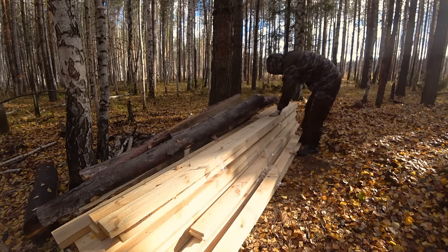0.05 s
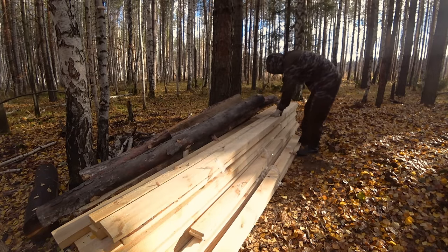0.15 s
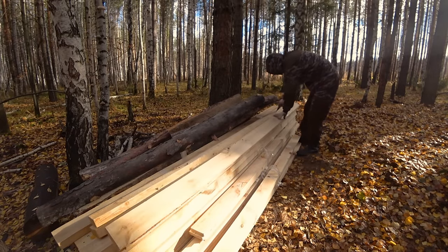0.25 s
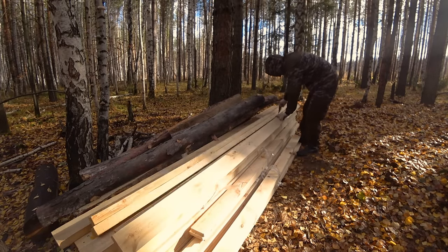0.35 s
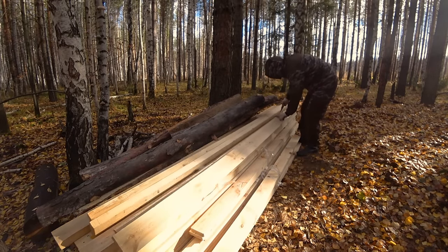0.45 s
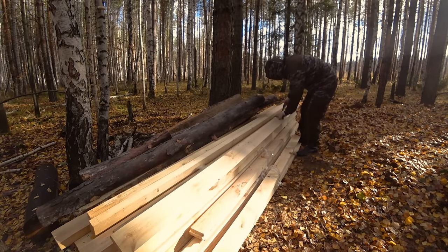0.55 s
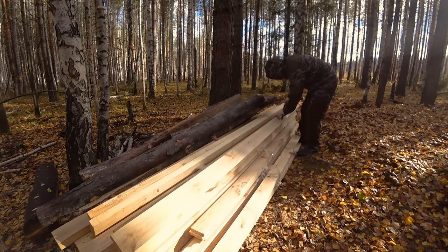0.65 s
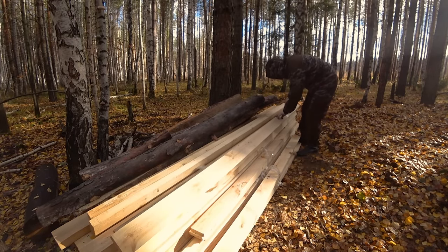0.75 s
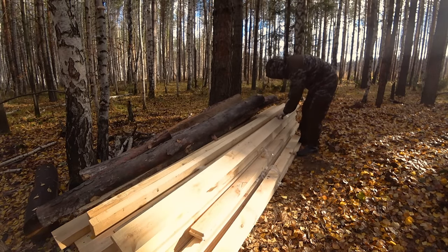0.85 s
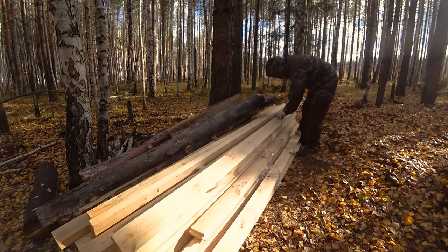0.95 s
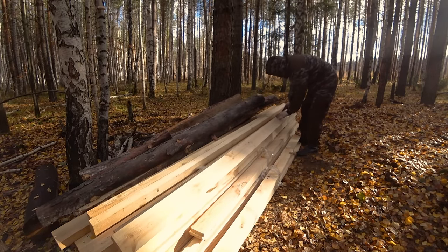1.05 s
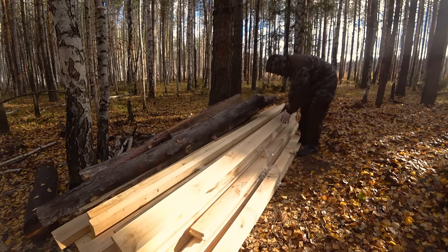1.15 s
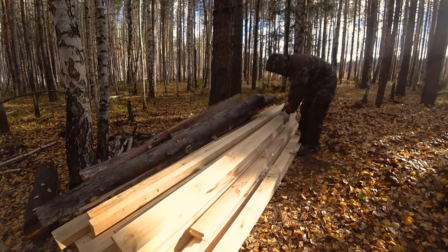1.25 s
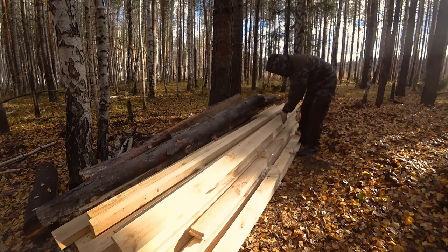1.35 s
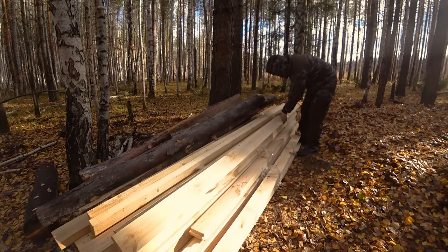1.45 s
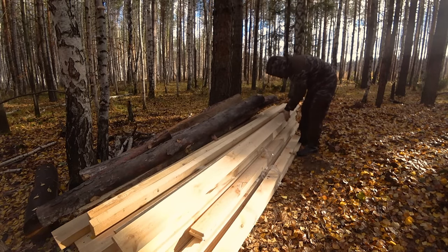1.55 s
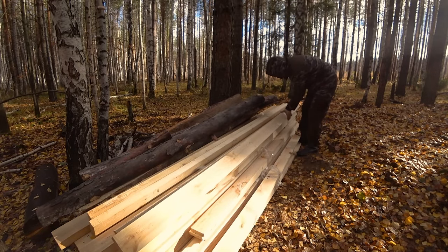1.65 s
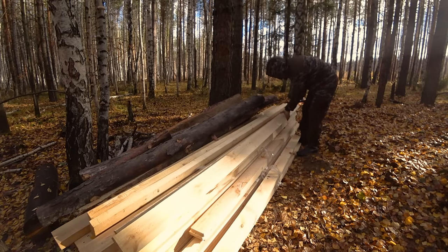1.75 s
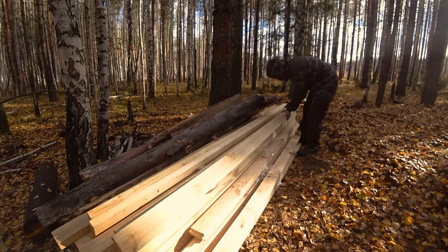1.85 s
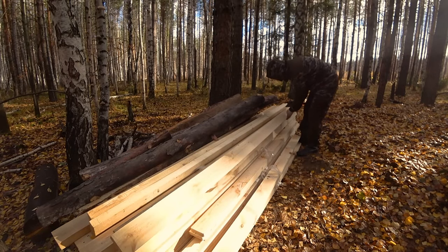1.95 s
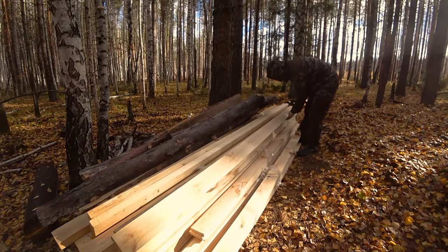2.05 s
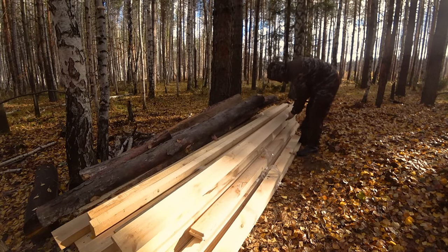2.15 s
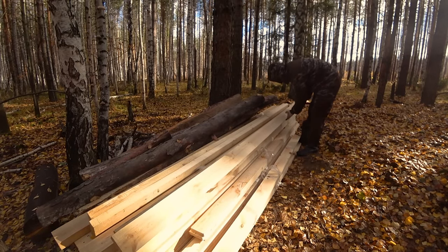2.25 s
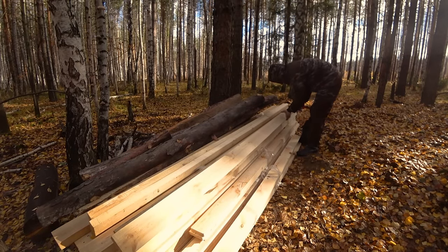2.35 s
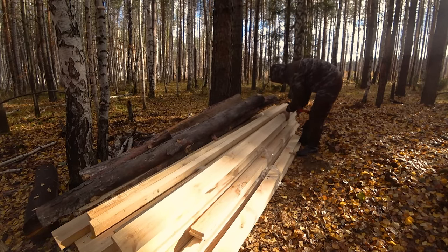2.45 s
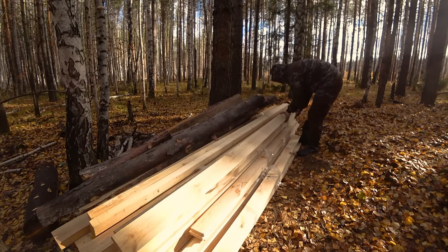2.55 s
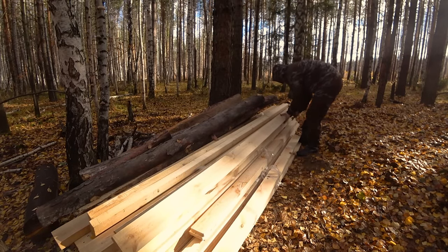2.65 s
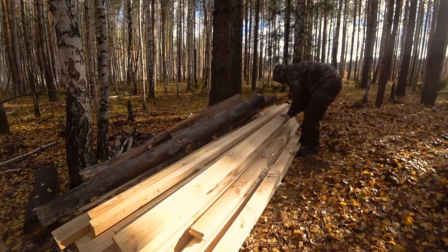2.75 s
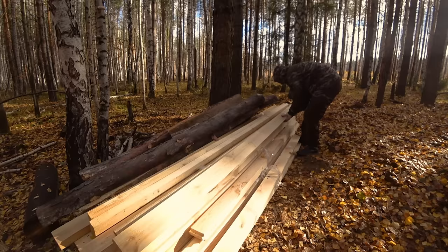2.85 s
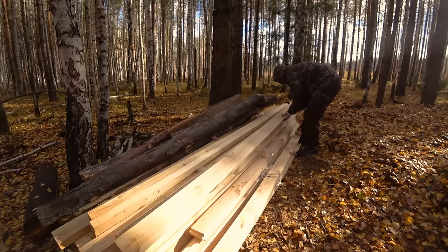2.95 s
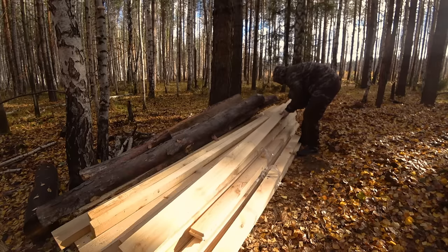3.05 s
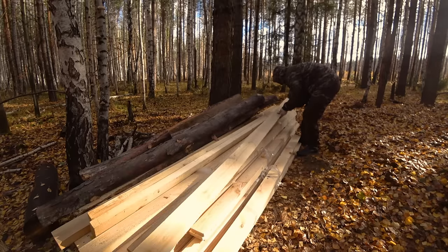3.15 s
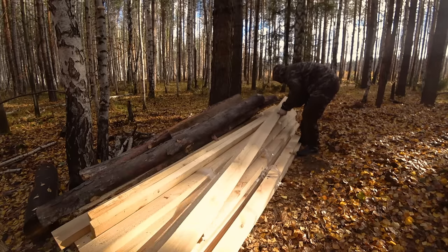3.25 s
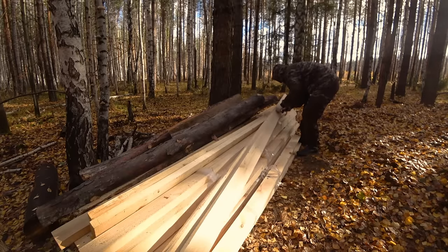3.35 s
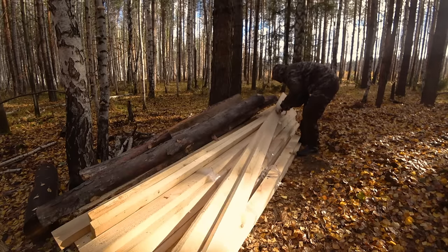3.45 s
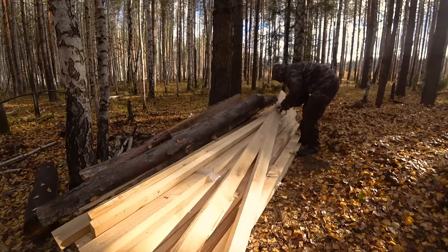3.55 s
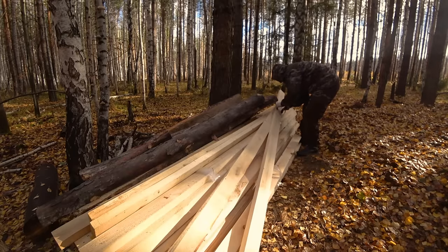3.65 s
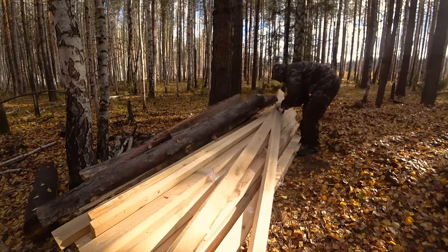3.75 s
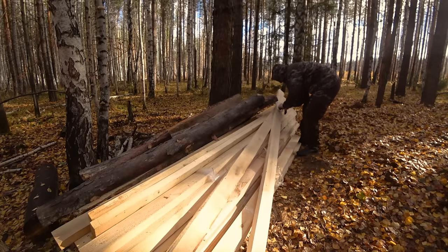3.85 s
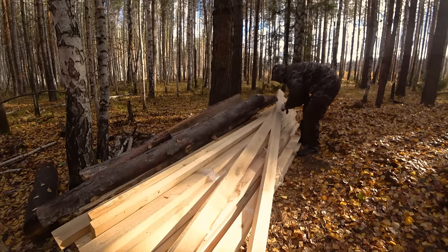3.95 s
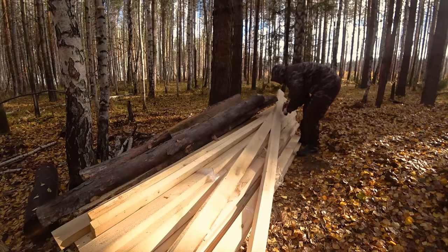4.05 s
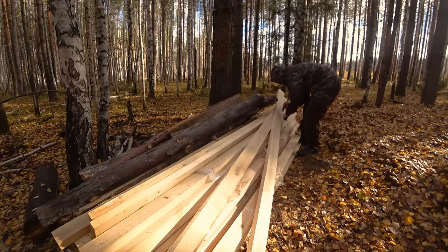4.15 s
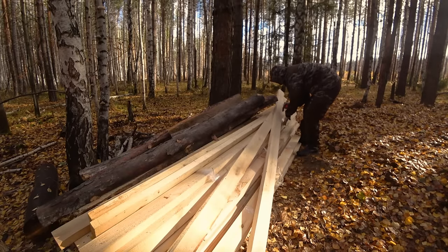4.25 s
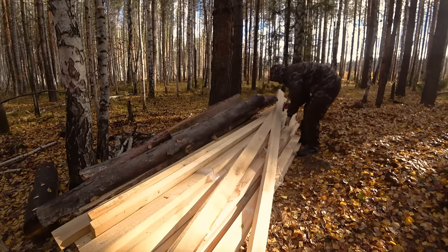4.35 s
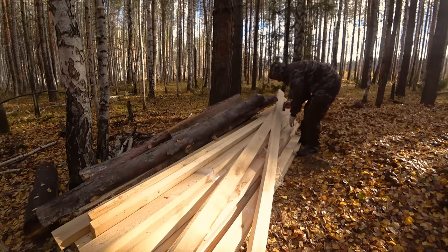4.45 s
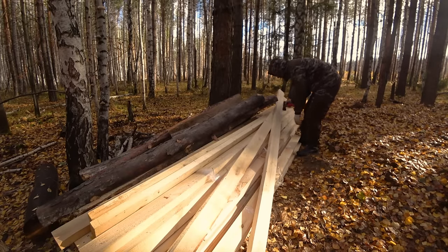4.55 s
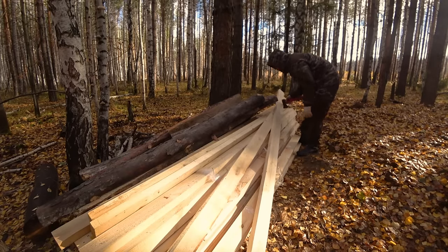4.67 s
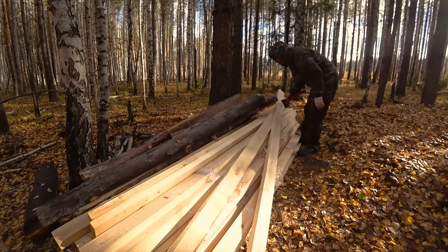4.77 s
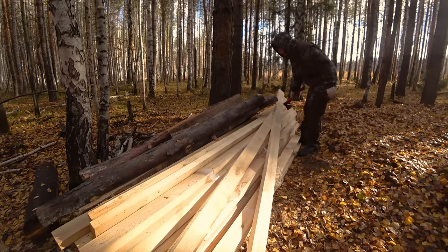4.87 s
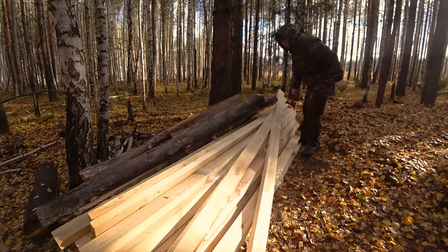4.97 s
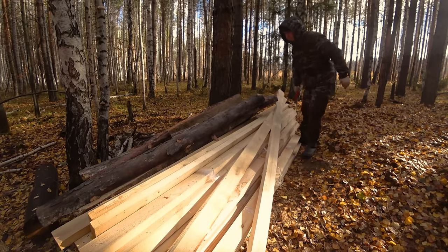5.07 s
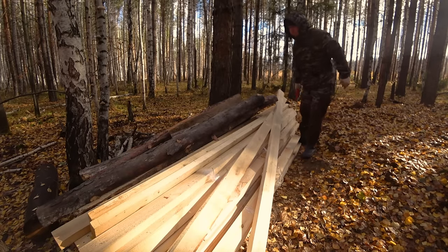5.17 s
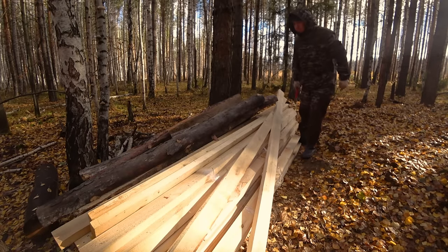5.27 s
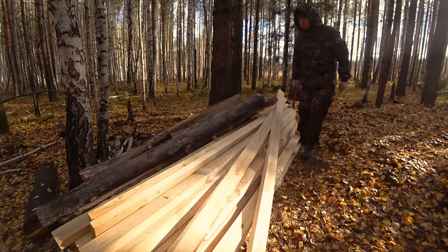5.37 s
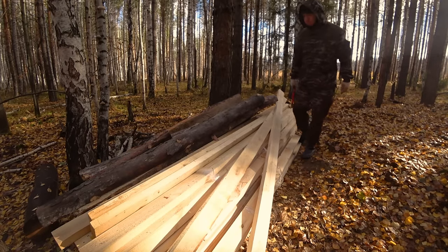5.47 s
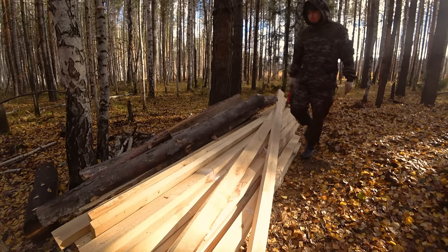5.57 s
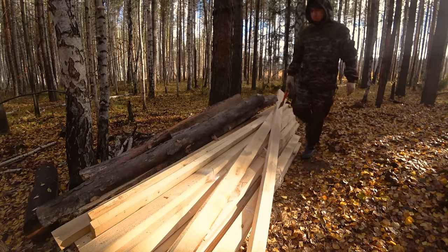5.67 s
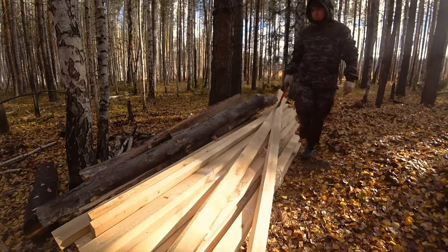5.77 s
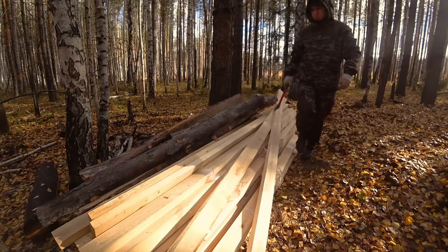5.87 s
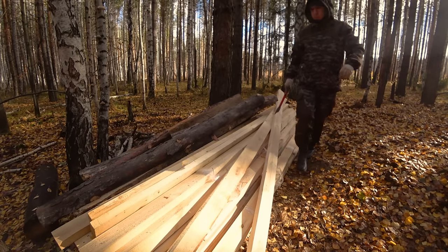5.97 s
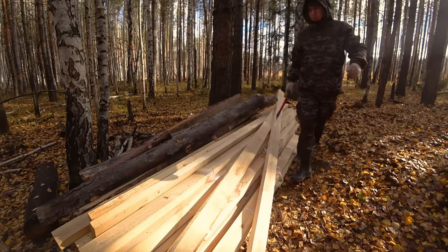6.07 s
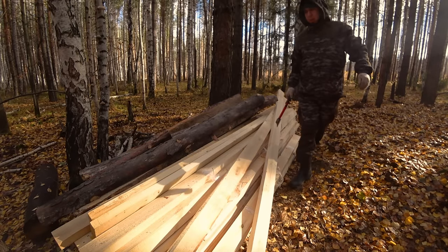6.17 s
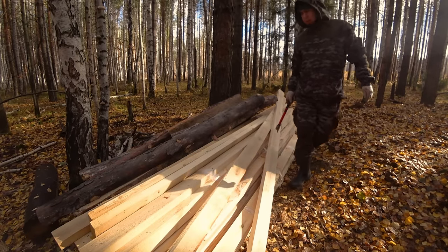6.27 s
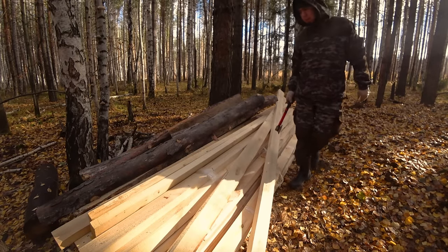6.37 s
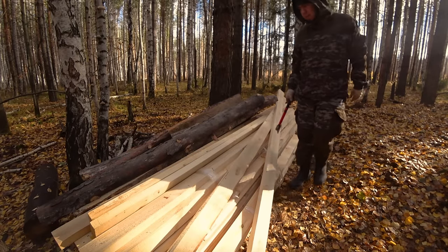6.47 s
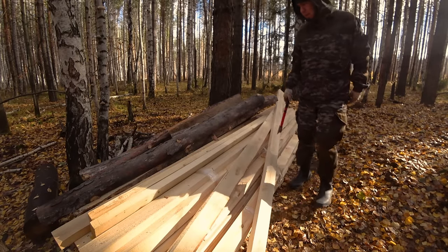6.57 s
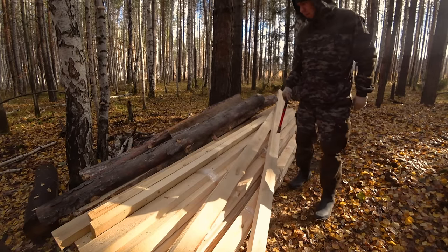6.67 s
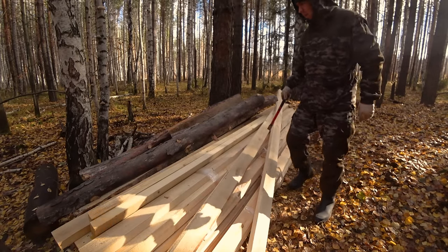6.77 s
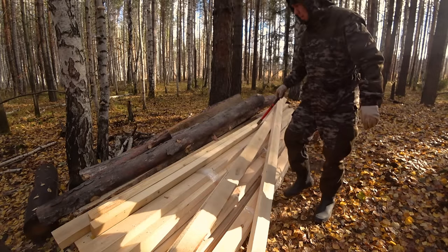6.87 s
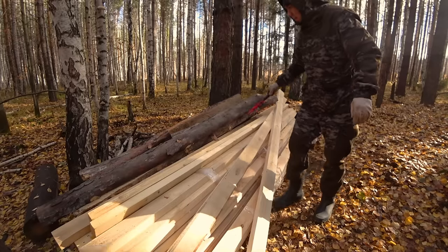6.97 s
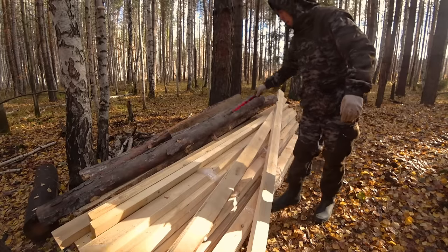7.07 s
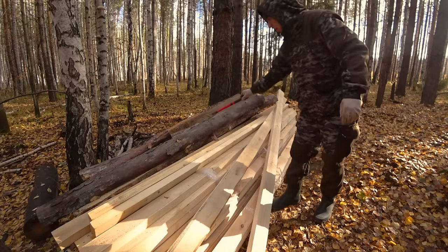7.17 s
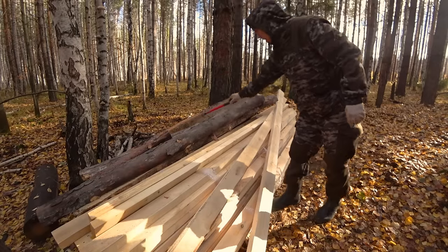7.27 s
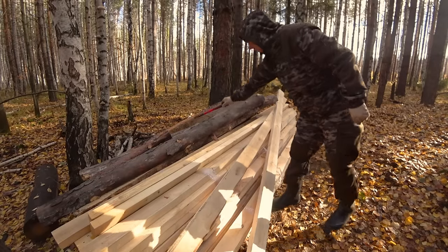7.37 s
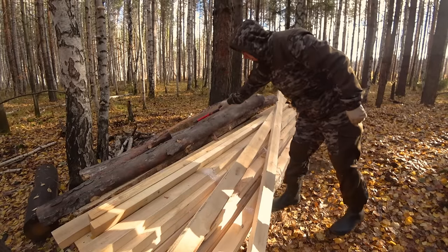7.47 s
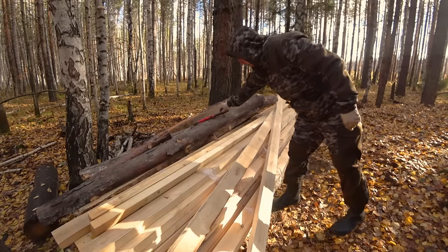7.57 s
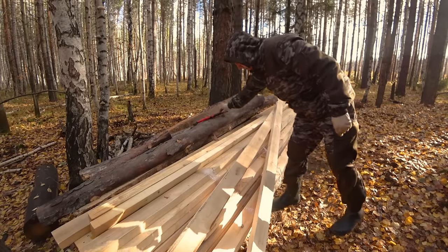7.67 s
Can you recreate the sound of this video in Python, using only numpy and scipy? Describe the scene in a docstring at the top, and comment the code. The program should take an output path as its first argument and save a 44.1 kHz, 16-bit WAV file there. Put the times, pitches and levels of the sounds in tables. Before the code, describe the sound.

Sawn planks are shifted on a pile outdoors: bright edge clacks, short woody rings, dry fibre crackle and rasping in two bursts separated by quiet air. The wood settles, boots brush softly then crunch nearer through dry leaves, and timber thumps dully to finish. Near, dry stereo pickup with soft hiss, a slight right lean and a thin tree-trunk echo.

```python
"""Sawn boards knock, bounce and clack on a pile in an autumn forest, rough faces scraping, splinters snapping;
later, boots wade through dry leaves. Boards are sums of decaying bending modes, clacks and snaps are short
filtered noise bursts, scrapes and leaves are streams of tiny random contacts, and weight on the soil is a
damped low tone with noise. Tree trunks return a faint noise-tail echo over slowly swaying forest air."""
import sys
import numpy as np
from scipy import signal
from scipy.fft import rfft, irfft, next_fast_len
from scipy.io import wavfile
from scipy.ndimage import uniform_filter1d

SR = 44100
rng = np.random.default_rng(int(sys.argv[2]) if len(sys.argv) > 2 else 0)


def to_wav(sig):
    """Store sig (one row per channel, or 1-D mono) as 16-bit WAV at the path in sys.argv[1].

    Samples outside -1..1 are clipped; the rate is SR.
    """
    pcm = np.clip(np.atleast_2d(sig), -1, 1) * 32767
    pcm = np.round(pcm).astype(np.int16)
    wavfile.write(sys.argv[1], SR, pcm.T)  # frames by channels


N = 340452  # samples
TIME = np.arange(N) / SR
RING_TIME = TIME[:SR // 3]
CONTROL_TIME = np.arange(0, N / SR, .002)  # a coarse clock for slow gain curves
GRID_HZ = np.linspace(1, SR / 2, 2049)  # where filter responses are drawn


def undb(db):
    """Decibels to gain."""
    return np.exp(np.asarray(db) * (np.log(10) / 20))


def unit(x):
    """Scale to rms 1."""
    return x / np.sqrt(np.mean(x ** 2))


def fade(t60, t=RING_TIME):
    """Decay that loses 60 dB in t60 seconds."""
    return np.exp(-np.log(1000) * t / max(t60, 1e-4))


def spectrum(points, hz=GRID_HZ):
    """Join (Hz, value) points on a log-frequency axis."""
    point_hz, value = np.transpose(points)
    return np.interp(np.log(hz + 1), np.log(point_hz + 1), value)


def resonance(hz, q):
    """Response of one resonance, in dB."""
    return -10 * np.log10(1 + (q * (GRID_HZ / hz - hz / GRID_HZ)) ** 2)


def tint(x, db):
    """Causal minimum-phase filter with the given dB response, made by folding the cepstrum."""
    cepstrum = irfft(np.log(undb(db)))
    half = len(cepstrum) // 2
    cepstrum[1:half] *= 2
    cepstrum[half + 1:] = 0
    impulse = irfft(np.exp(rfft(cepstrum)))
    return signal.oaconvolve(x, impulse)[:len(x)]


def add(track, s, x):
    """Mix a sound in at time s."""
    i = min(int(s * SR), N)
    track[i:i + len(x)] += x[:N - i]


def walk(rate):
    """Random level that glides to a new value `rate` times a second; spread near 1."""
    k = int(SR / rate)
    held = np.repeat(rng.standard_normal(N // k + 1), k)
    return unit(uniform_filter1d(held, k)[:N])


def grains(rate, spread_db, patchy_db, patch_rate):
    """Tiny contacts of uneven size, `rate` a second on average, that come in louder and softer bunches."""
    size = np.minimum(rng.exponential(size=N // 4), 4)
    sign = rng.choice([-1, 1], N // 4)
    at = np.flatnonzero(rng.random(N) < rate / SR)[:len(size)]
    bunch = np.interp(at * patch_rate / SR, np.arange(N // 100), rng.standard_normal(N // 100))
    # sqrt(3/2) gives back the spread that interpolation takes away
    level_db = spread_db * size[at // 4] + patchy_db * np.sqrt(3 / 2) * bunch
    out = np.zeros(N)
    out[at] = sign[at // 4] * undb(level_db)
    return out


def swell(s, rise, hold, fall):
    """Attack, hold from time s, release; rise and fall are the seconds that 20 dB take."""
    early = np.maximum(s - CONTROL_TIME, 0)
    late = np.maximum(CONTROL_TIME - s - hold, 0)
    return .1 ** np.minimum(early / max(rise, 1e-3) + late / max(fall, 1e-3), 6)


def per_sample(curves):
    """Slow gain curves at the sample rate."""
    return [np.interp(TIME, CONTROL_TIME, curve) for curve in curves]


# bending modes of three pieces of timber, by name: pitch_hz, level_db, t60_s (before the ring length factor)
BOARD_MODES = { "upper": [(149, -15.5, 0.29), (224, -10, 0.037), (276, 2, 0.15), (366, -7.5, 0.057),
               (433, -2.5, 0.12), (543, 2.5, 0.088), (628, 1.5, 0.062), (760, -13, 0.033),
               (800, -4.5, 0.09), (950, -1.5, 0.041), (1053, -3.5, 0.13), (1140, -14, 0.087),
               (1373, -10.5, .07)], "long": [(144.3, -19, 0.21), (282.4, -1, 0.27), (384.6, -11, 0.14),
               (474, -4, .18), (580.3, -11, 0.16), (608.5, -2.5, 0.23), (710, 3.5, 0.09), (803, -2, 0.071),
               (848, -2.5, 0.087), (820, -11, 0.042), (985, -3.5, .08), (1128, -12.5, 0.05),
               (1428, -12, 0.071), (1510, -7.5, 0.097), (1774, -9, 0.052), (1947, -19, .06),
               (2150, -21.5, 0.044)], "lower": [(155, -6.5, 0.29), (253, 5.5, 0.076), (292, 1.5, 0.17),
               (350, -9.5, 0.33), (482, 6.5, 0.3), (552, 2.5, 0.19), (683, 8, 0.2), (893, 3, 0.094),
               (996, -1, 0.046), (1167, 13.5, 0.02), (1500, -24, 0.045)]}


def timber_ring(name, length, travel_s=.003):
    """A board's modes; bending waves run slower the lower they are, so the bass arrives late."""
    out = 0
    for hz, db, t60 in BOARD_MODES[name]:
        t = np.maximum(RING_TIME - travel_s * np.sqrt(300 / hz), 0)
        out = out + undb(db) * np.sin(2 * np.pi * hz * t) * fade(t60 * length, t)
    return out


# a board lands on one end, then slaps flat: start_s, timber, level_db, lowest_excited_hz, highest_excited_hz,
# ring length factor, pile_clatter_db (against the ring), slap_delay_s, slap_db (over the first touch),
# factor on both excited limits for the slap
LANDINGS = [(.148, "upper", -20, 860, 3800, 0.83, 4, .015, 0, 0.4),
            (.26, "upper", -34, 130, 2000, 0.4, 7.5, .006, -15, 0.82),
            (0.3444, "upper", -32, 750, 1044, .23, -3.5, 0.0046, -17, 0.79),
            (.355, "upper", -30.5, 115, 2000, 1.7, 2.5, .019, -9, 0.66),
            (.483, "upper", -18.5, 299.8, 660, 2, -8, 0.0079, -2.5, 0.91),
            (.558, "upper", -29, 329.8, 558.4, .7, -10, .006, 3, 1.06),
            (1.538, "long", -39.5, 453, 950, 0.9, -3.5, .011, 2, 0.9),
            (2.824, "long", -19, 282, 1005, 1, -7.5, .009, 6, 1.41),
            (3.167, "long", -31, 130, 2400, 0.89, 1.5, .012, -3.5, 0.37),
            (3.655, "long", -20, 390, 2500, 1.9, -1, .007, -4, 0.74),
            (3.791, "long", -38.5, 90, 900, 0.61, 7.5, .008, -6, 1.1),
            (3.884, "long", -42, 400, 800, 0.42, -1, 0.033, -1.5, 0.54),
            (7.086, "lower", -31.5, 119, 700, 1.22, 16, .006, -7.5, 3.5),
            (7.584, "lower", -14, 175, 440, 1.05, -6.5, .004, 1.5, 2.06),
            (7.707, "lower", -29.5, 120, 446, 2.1, 10, .004, -19, 1)]
# rebound against the slap: its wait in slap delays, its level in dB, the factor on its band
REBOUND_WAIT, REBOUND_DB, REBOUND_SOFTNESS = 1.7, -8.5, .75


def contacts():
    """Every landing is a first touch, a slap, and a weaker, softer rebound on the same ringing board."""
    for s, name, db, low_hz, high_hz, length, clatter_db, delay, slap_db, hardness in LANDINGS:
        modes = timber_ring(name, length)
        touch = 0, 0, 1
        slap = delay, slap_db, hardness
        rebound = delay * (1 + REBOUND_WAIT), slap_db + REBOUND_DB, hardness * REBOUND_SOFTNESS
        for late, lift_db, band in [touch, slap, rebound]:
            yield s + late, name, modes, db + lift_db, low_hz * band, high_hz * band, length, clatter_db


# colour of the jostled pile: pitch_hz, level_db
PILE_COLOUR = [(50, -36), (105, -16), (160, 1.5), (300, -0.5), (700, -2.5), (1100, -2), (1350, -5),
               (1900, -6.5), (3500, -16), (4500, -10.5), (7000, -17), (16000, -37)]


def knocks(radiate_hz=125, choke_t60=0.06, clatter_t60=0.11):
    """Each blow rings one board and jostles the pile; a softer contact leaves the high modes still."""
    out, attack, blows = np.zeros(N), slice(SR // 80), list(contacts())
    # narrow boards radiate little bass
    radiation = -10 * np.log10(1 + (radiate_hz / (GRID_HZ + 10)) ** 8)
    for s, name, modes, db, low_hz, high_hz, length, clatter_db in blows:
        contact = -10 * np.log10((1 + (low_hz / GRID_HZ) ** 5) * (1 + (GRID_HZ / high_hz) ** 5))
        contact = np.maximum(contact, -50) + radiation
        # the next contact on the same board chokes what still rings
        free_s = min([row[0] - s for row in blows if row[1] == name and row[0] > s], default=1)
        choke = fade(choke_t60, np.maximum(RING_TIME - free_s, 0))
        ring = tint(modes * choke, contact)
        noise = rng.standard_normal(len(RING_TIME)) * fade(clatter_t60 * length)
        clatter = tint(noise, contact + spectrum(PILE_COLOUR))
        # levels are set over the attack, not the whole ring
        blow = ring / ring[attack].std() + undb(clatter_db) * clatter / clatter[attack].std()
        add(out, s, undb(db) * blow / blow[attack].std())
    return out


# short cross-grain modes that edges and rasping ring: pitch_hz, width_hz (before sharpening), lift_db
GRAIN_PEAKS = [(1713, 13, 0.5), (1878, 40, 1), (1970, 35, 6), (2120, 35, 2.5), (2240, 70, 1),
               (2486, 8.9, 3.5), (2868, 26, 3.5), (3820, 35, 8.5), (4270, 18, 4), (4443, 27, 5.5)]


def cross_grain():
    """Narrow peaks that the wood lends to every hard contact, in dB."""
    return sum(db * undb(2 * resonance(hz, hz / width)) for hz, width, db in GRAIN_PEAKS)


def burst(t60, tail_db, tail_t60, colour):
    """A sudden crack with a weak tail from the wood around it; peak 1."""
    t = RING_TIME[:SR // 6]
    envelope = fade(t60, t) + undb(tail_db) * fade(tail_t60, t)
    x = tint(rng.standard_normal(len(t)) * envelope, colour)
    return x / np.abs(x).max()


# hard edge-on-edge clacks: start_s, peak_db, pitch_hz, t60_s
EDGE_CLACKS = [(.1465, -15, 2700, .03), (.151, -1.5, 2900, .014), (.158, -18, 2700, .24),
               (.2025, -11, 1837, .009), (.2335, -19, 2802, .02), (.2825, -20, 2330, .025),
               (.673, -26, 1840, 0.021), (2.103, -42.5, 1700, .02), (3.1685, -12, 2718, .025),
               (3.29, -10, 1813, .014), (3.3025, -15, 1800, 0.13), (3.365, -27.5, 1703, .012),
               (3.3945, -14, 2900, .02), (3.4185, -27.5, 2200, .01), (3.653, -8.5, 1850, .05),
               (3.672, -16.5, 2088, .06), (3.942, -25, 1720, .018), (4.704, -41.5, 2090, .012),
               (6.212, -31, 2860, .016), (7.0908, -26, 2305, .036), (7.585, -21, 2570, 0.013),
               (7.597, -45, 4800, .13)]


def clacks():
    """Hard edges meet and ring briefly across the grain."""
    out = np.zeros(N)
    edge = [(100, -17.5), (1200, -4), (2000, -1), (3600, -4), (4600, 2.5),
            (7000, -6.0), (9000, -5.0), (12000, -9.5), (16000, -35.5)]  # (Hz, dB)
    for s, db, hz, t60 in EDGE_CLACKS:
        colour = spectrum(edge) + resonance(hz, 3.1) + cross_grain()
        add(out, s, undb(db) * burst(t60, -22.0, 0.089, colour))
    return out


# splinters and twigs crack, then part: start_s, peak_db (first crack), pitch_hz, parting_wait_s
SPLINTER_SNAPS = [(.205, -21, 5000, .019), (.289, -18, 4200, 0.0073), (.415, -20, 5600, 0.0081),
                  (.547, -13.5, 6500, .01), (.569, -17, 6000, .001), (.619, -31.5, 5000, .015),
                  (.757, -27.5, 7500, 0.0072), (1.95, -24.5, 4100, .003), (1.96, -21, 4500, 0.0068),
                  (1.999, -36, 3990, 0.045), (3.024, -17, 4200, 0.011), (3.114, -20.5, 3500, 0.0083),
                  (3.153, -13, 4000, .004), (3.576, -9, 4700, .019), (3.618, -4.5, 4200, .005),
                  (3.703, -13, 4300, .001), (3.782, -17, 4540, .012), (3.906, -10.5, 5460, .001),
                  (4.136, -42, 4900, 0.05), (4.253, -39, 4900, 0.075), (4.61, -49.5, 4400, .001),
                  (4.705, -45.5, 4490, 0.00098), (5.01, -48.5, 4500, .001), (5.964, -35.5, 5000, .001),
                  (6.212, -31, 4160, 0.0027)]
# colour of tearing wood fibres, also heard in the slides: pitch_hz, level_db (per Hz)
FIBRE_COLOUR = [(300, -37.5), (1500, -19), (2700, -3), (3600, -8), (4200, 3.5), (5300, -2.5), (6900, -10.5),
                (8200, -5.5), (10500, -12.5), (13000, -18.5), (16000, -37)]


def snaps(parting_db=-2.5):
    """Splinters and twigs break in two cracks of a few milliseconds each, the second slightly weaker."""
    out = np.zeros(N)
    for s, db, hz, wait in SPLINTER_SNAPS:
        colour = .8 * spectrum(FIBRE_COLOUR) + resonance(hz, 1.1) + .5 * cross_grain()
        for late, lift_db in [(0, 0), (wait, parting_db)]:
            add(out, s + late, undb(db + lift_db) * burst(.004, -22, .022, colour))
    return out


# shoves of board over board: hardest_grip_s, build_up_s, run_out_s (both per 20 dB),
# fibre_crackle_db, edge_rasp_db, board_groan_db
BOARD_SHOVES = [(.165, 0.022, .12, -40, -43, -46), (.24, 0.073, 0.088, -42.5, -39, -61.5),
                (.292, 0.075, 0.055, -43, -40, -53), (0.358, 0.031, 0.18, -35, -40.5, -52),
                (0.498, 0.043, .06, -37.5, -38, -49.5), (.64, .1, .13, -53, -57.5, -62),
                (.82, 0.056, 0.07, -57.5, -67, -85), (1.95, 0.069, 0.05, -51.5, -47.5, -73.5),
                (2.012, 0.041, 0.054, -40.5, -65, -69.5), (2.928, 0.1, .15, -56.5, -45.5, -42),
                (3.025, .04, 0.065, -42, -53, -50), (3.115, .11, 0.06, -36, -47.5, -42),
                (3.152, .025, 0.036, -35.5, -46, -47), (3.179, .045, 0.08, -32, -45, -41.5),
                (3.24, 0.067, 0.14, -53, -39.5, -44), (3.305, 0.045, .13, -37, -41, -53.5),
                (3.39, .04, .06, -39, -46, -46), (3.484, 0.049, .05, -43, -47, -44.5),
                (3.605, 0.1, .15, -33, -43.5, -29.5), (3.671, 0.067, .06, -25, -27.5, -25.5),
                (3.755, .03, 0.06, -33.5, -42, -48.5), (3.795, 0.033, 0.087, -37.5, -40.5, -42.5),
                (3.92, .14, 0.066, -41, -54, -51), (3.972, .025, 0.037, -44, -56.5, -75)]


def friction():
    """Crackle, rasp and groan build up and run out together in every shove; three gain curves."""
    power = 0
    for s, rise, fall, *levels_db in BOARD_SHOVES:
        power = power + np.outer(undb(levels_db), swell(s, rise, 0, fall)) ** 2
    return per_sample(np.sqrt(power))


# colour of rasping edges: pitch_hz, level_db (per Hz)
RASP_COLOUR = [(300, -22), (900, -12), (1350, -5), (1850, -4.5), (2300, -4.5), (2900, -6), (3600, -12.5),
               (6000, -28.5), (16000, -60)]
# resonances of the dragged board: pitch_hz, width_hz (before sharpening), level_db (before it wanders)
GROAN_MODES = [(440, 170, -13), (600, 210, 0), (720, 83, 1.5), (800, 60, -3.5), (854, 17, -4),
               (1090, 47, -12)]


def slides(splinter_db=-7, shift_db=2.0):
    """Sawn faces catch and slip: fibres crackle, edges rasp and the dragged board groans."""
    crackle, rasp, groan = friction()
    torn = spectrum(FIBRE_COLOUR) + cross_grain()
    fibres = unit(tint(grains(3000, 3.5, 2.2, 130), torn))
    # now and then a thicker splinter catches and ticks out of the crackle
    splinters = unit(tint(grains(170, 3, 1.5, 40), torn))
    tearing = unit(fibres + undb(splinter_db) * splinters)
    slips = grains(1600, 2.2, 2.6, 80)
    edges = unit(tint(slips, spectrum(RASP_COLOUR) + cross_grain()))
    # the contact point travels, so the board's resonances take turns
    judder = grains(2400, 1.5, 1.3, 60)
    body = 0
    for hz, width, db in GROAN_MODES:
        body = body + undb(db + shift_db * walk(22)) * tint(judder, 1.4 * resonance(hz, hz / width))
    board = unit(body + undb(-25) * tint(slips, spectrum(PILE_COLOUR)))
    return crackle * tearing + rasp * edges + groan * board


# boots in dry leaves: start_s, swing_length_s, rustle_db, crunch_db,
# treble_db (driest leaves against the rustle)
BOOT_STEPS = [(0, .08, -65.5, -64, -9.5), (4.06, .06, -65, -84, 0.5), (4.29, 0.024, -54.5, -81, 0),
              (4.9, .1, -70.5, -93.5, 4), (5.39, .05, -72, -78, 4.5), (5.5, 0.055, -59.5, -79, 1),
              (5.76, 0.087, -68, -82, -0.5), (6.135, 0.028, -43.5, -55.5, -7),
              (6.36, 0.057, -82.5, -63.5, -5.5), (6.67, 0.042, -46, -42.5, 3.5),
              (7.08, .04, -51.5, -58.5, -2), (7.38, .14, -51, -59, 0.5)]
SWING_RISE_S, SWING_FALL_S = 0.029, 0.036  # time for 20 dB
# the sole lands this long after the swing; rise and fall times for 20 dB
LANDING_S, TREAD_RISE_S, TREAD_FALL_S = .05, .05, 0.12
# leaves spring up around the sole: level against the swing, time to settle by 20 dB
TREAD_RUSTLE_DB, SETTLE_S = -8, .17
# the heel stirs the leaves before the swing: level against the swing, time to rise by 20 dB
LIFT_DB, LIFT_S = -17, .15
SWING_CRUNCH_DB = -18  # a moving boot always crushes a few leaves: level against the rustle


def gait():
    """A heel lifts, the boot swings, then its sole lands; gains of rustle, its treble and crunch."""
    out = 0
    for s, length, rustle_db, crunch_db, treble_db in BOOT_STEPS:
        lands = s + length + LANDING_S
        lift = undb(LIFT_DB) * swell(s, LIFT_S, length, SWING_FALL_S)
        swing = swell(s, SWING_RISE_S, length, SWING_FALL_S)
        settle = undb(TREAD_RUSTLE_DB) * swell(lands, TREAD_RISE_S, 0, SETTLE_S)
        rustle = undb(rustle_db) * np.sqrt(lift ** 2 + swing ** 2 + settle ** 2)
        tread = undb(crunch_db) * swell(lands, TREAD_RISE_S, 0, TREAD_FALL_S)
        crunch = tread + undb(SWING_CRUNCH_DB) * rustle
        out = out + np.array([rustle, undb(treble_db) * rustle, crunch])
    return per_sample(out)


# colour of dry leaves: pitch_hz, level_db (per Hz)
LEAF_COLOUR = [(500, -47.5), (2000, -26), (3500, -9), (4300, 7), (5200, 1), (6700, -9.5), (8500, -5),
               (11000, -12), (13000, -22), (16000, -43)]


def steps(treble_hz=6500):
    """Dry leaves brush over the boots and crush under the soles."""
    rustle, treble, crunch = gait()
    leaves = unit(tint(grains(3000, 3.1, 2, 110), spectrum(LEAF_COLOUR)))
    high_pass = signal.butter(2, treble_hz, "high", fs=SR, output="sos")
    driest = signal.sosfiltfilt(high_pass, leaves)
    crushed = [(300, -20), (1000, -13.5), (1400, 2.5), (2300, 4), (3000, 3), (4500, 1.5), (16000, -41)]  # (Hz, dB)
    litter = unit(tint(grains(1400, 3.0, 1.6, 83), spectrum(crushed)))
    return rustle * (leaves - driest) + treble * driest + crunch * litter


# weight landing on the soil: start_s, level_db, pitch_hz, t60_s
SOIL_THUDS = [(0.351, -46.5, 84.1, 0.35), (.49, -48, 81, 0.37), (3.789, -33.5, 75.7, .28),
              (6.225, -49, 71, 0.18), (7.09, -47, 100.8, 0.17)]


def thuds():
    """The soft ground answers weight with a low, damped swing."""
    out = np.zeros(N)
    for s, db, hz, t60 in SOIL_THUDS:
        soil = unit(tint(rng.standard_normal(len(RING_TIME)), 2 * resonance(hz, 3.1)))
        envelope = fade(t60) * (1 - fade(.04))
        tone = np.sin(2 * np.pi * hz * RING_TIME)
        add(out, s, undb(db) * envelope * (tone + 0.46 * soil))
    return out


# phase between the two microphone ports: pitch_hz, left_lead_rad (negative: the right port leads)
PORT_LEAD = [(20, 0), (90, -.15), (200, -.4), (500, -.75), (1150, -.75), (2300, -.48), (3800, -.3),
             (7000, -.4), (16000, -.45)]


def from_right(x):
    """The work goes on right of centre, so the right microphone port leads."""
    size = next_fast_len(N + SR // 10, True) // 2 * 2
    lead = spectrum(PORT_LEAD, np.linspace(0, SR / 2, size // 2 + 1))
    turn = np.exp(1j * lead / 2)  # half the lead to each port
    whole = rfft(x, size)
    return np.array([irfft(whole * way)[:N] for way in (turn, turn.conj())])


def ground(x, db=-17):
    """Leaves and board ends close by scatter the treble a little differently to each port."""
    t = TIME[:SR // 60]
    scatter = rng.standard_normal((2, len(t))) * fade(.01, t)
    bright = tint(x, spectrum([(200, -14), (1500, -4), (4500, -1), (8000, 5), (12000, 7)]))  # (Hz, dB)
    return undb(db) * np.array([signal.oaconvolve(bright, s / np.linalg.norm(s))[:N] for s in scatter])


def trunks(x, near_db=-27, near_t60=0.3, far_db=-43, far_s=0.94, far_spread_s=.11):
    """Trunks scatter a thin tail to each ear; a distant stand of trees answers about a second later."""
    t = TIME[:3 * SR // 2]
    near = fade(near_t60, t) * (1 - fade(.12, t))
    far = np.exp(-.5 * ((t - far_s) / far_spread_s) ** 2)
    envelope = (undb(near_db) * unit(near) + undb(far_db) * unit(far)) / np.sqrt(len(t))
    bark = [(80, -13), (300, -7.0), (800, 4.5), (2000, 3), (4500, -4.5), (9000, -15), (16000, -24.5)]  # (Hz, dB)
    ears = []
    for _ in range(2):
        echo = tint(rng.standard_normal(len(t)) * envelope, spectrum(bark))
        ears.append(signal.oaconvolve(x, echo)[:N])
    return np.array(ears)


# colour of the still air and hiss: pitch_hz, level_db (per Hz)
AIR_COLOUR = [(15, -39.5), (25, -9.5), (102, -2.5), (137, -6.5), (223, -2), (394, -3.5), (531, -6.5),
              (575, -4.5), (1290, -15.5), (2760, -22), (3620, -23.5), (5280, -23), (7110, -34.5),
              (10100, -35.5), (16000, -60.5)]
# stereo width of the air: pitch_hz, side_minus_mid_db
AIR_WIDTH = [(60, -19.5), (110, -21.5), (200, -12.5), (380, -8), (700, -5), (1290, -0.5), (2380, 1.5),
             (4400, -8.5), (8120, -2.5), (15000, -3.5)]


def air(level_db=-62, sway_db=-1.62):
    """Still forest air and microphone hiss: shared in the bass, wider in the treble, its level swaying."""
    mid, side = (tint(rng.standard_normal(N), spectrum(AIR_COLOUR)) for _ in range(2))
    side = tint(side, spectrum(AIR_WIDTH))
    gain = undb(level_db + sway_db * walk(0.97))
    return gain * np.array([mid + side, mid - side]) / mid.std()


def scene():
    """Wood and footsteps, their echoes and the forest air."""
    work = knocks() + clacks() + snaps() + slides() + steps() + thuds()
    return from_right(work) + ground(work) + trunks(work) + air()


def record(dry, port_hz=13500, top_hz=15800):
    """The microphone ports dull the highest treble and a steep low-pass cuts the top."""
    port = signal.butter(3, min(port_hz, .45 * SR), fs=SR, output="sos")
    steep = signal.ellip(8, .2, 70, top_hz, fs=SR, output="sos")
    return signal.sosfilt(steep, signal.sosfilt(port, dry))


dry = scene()
out = record(dry)
to_wav(out)
```